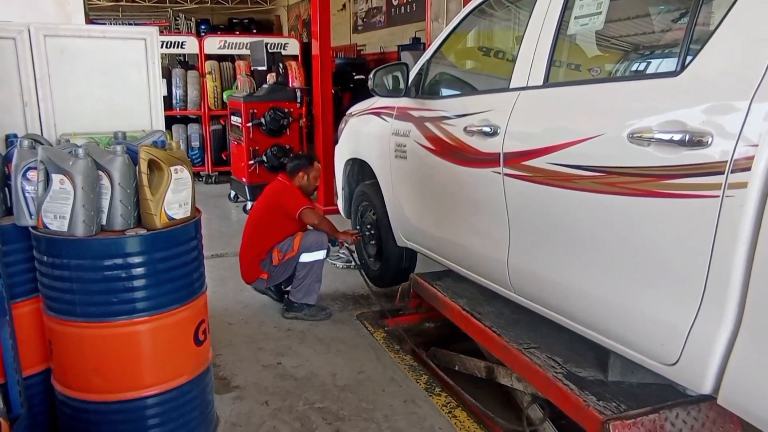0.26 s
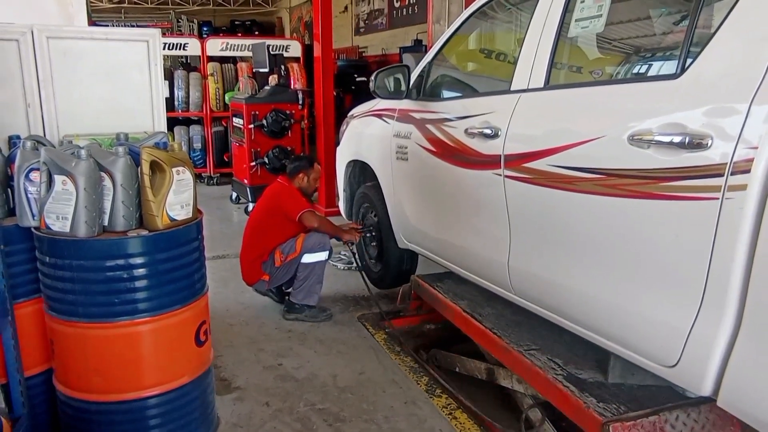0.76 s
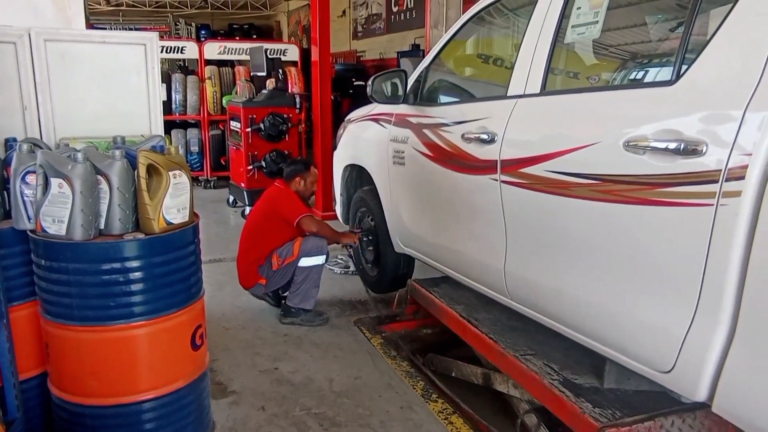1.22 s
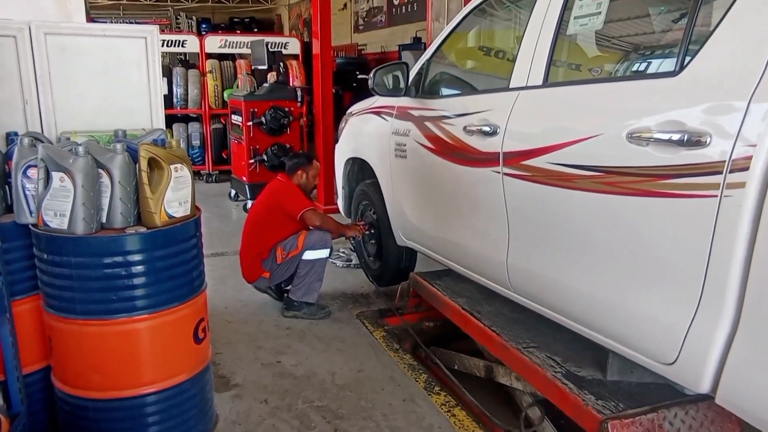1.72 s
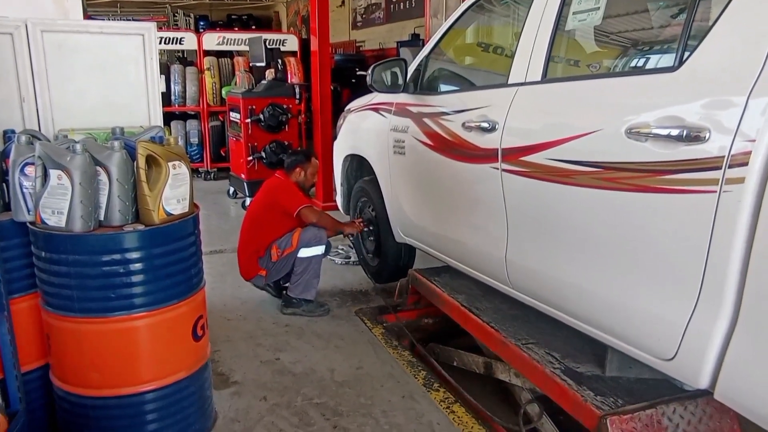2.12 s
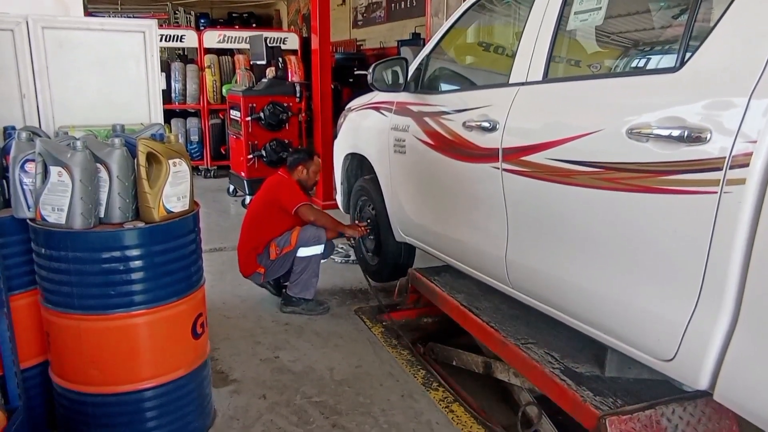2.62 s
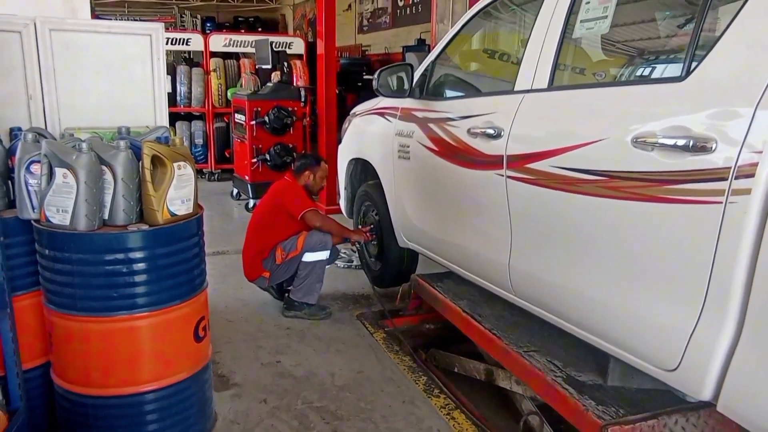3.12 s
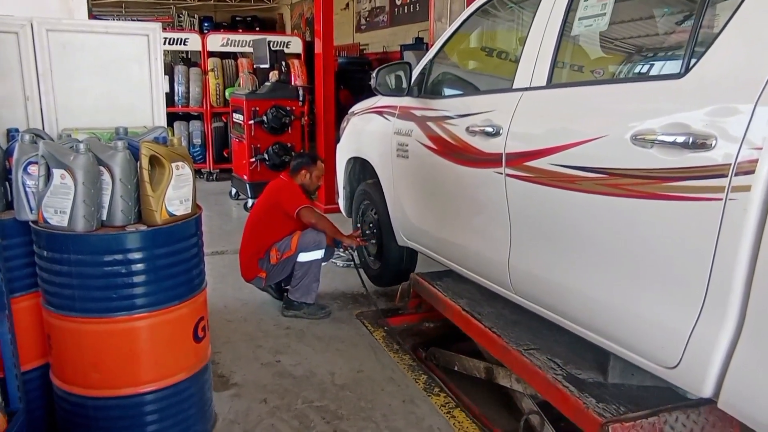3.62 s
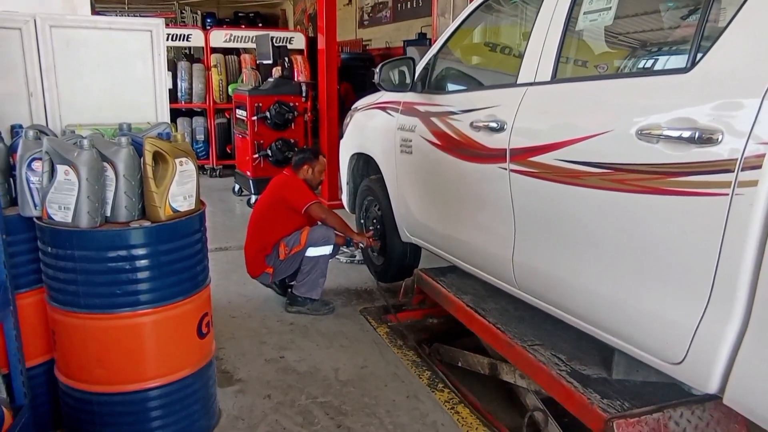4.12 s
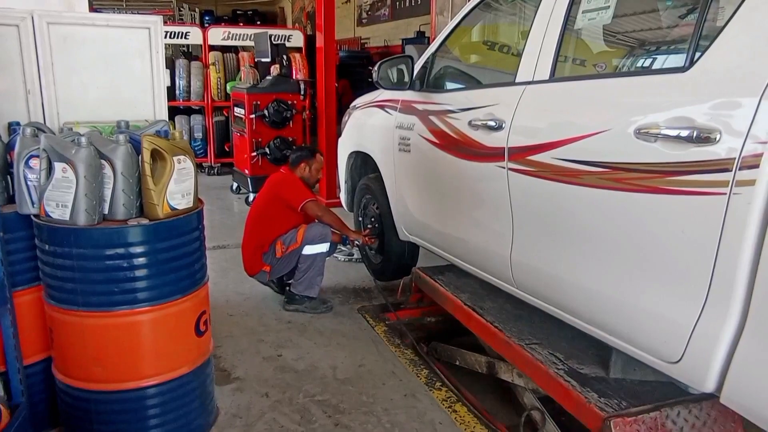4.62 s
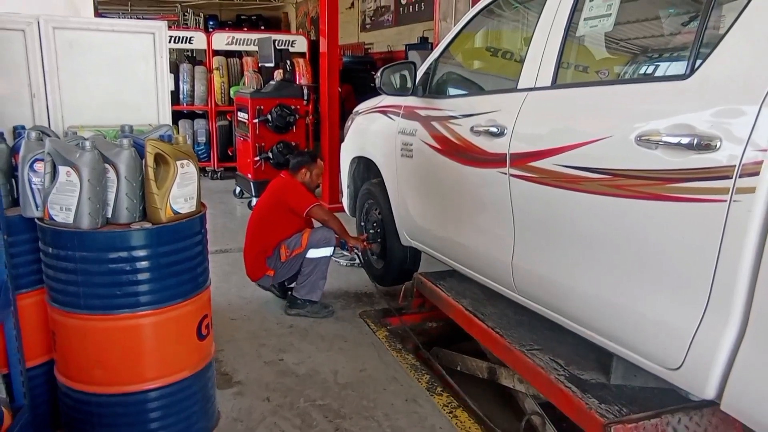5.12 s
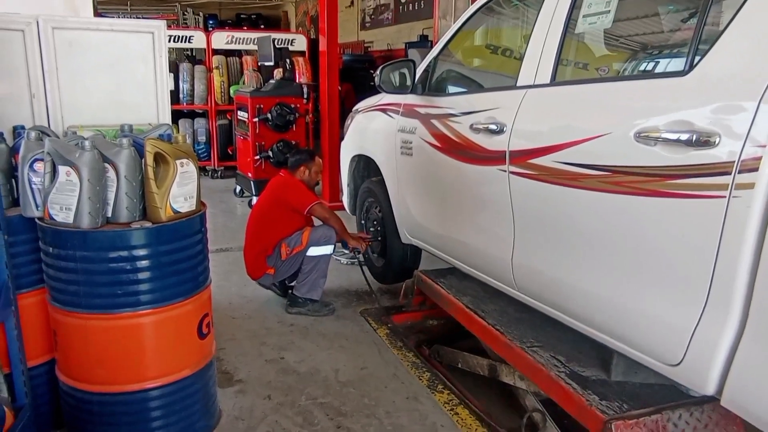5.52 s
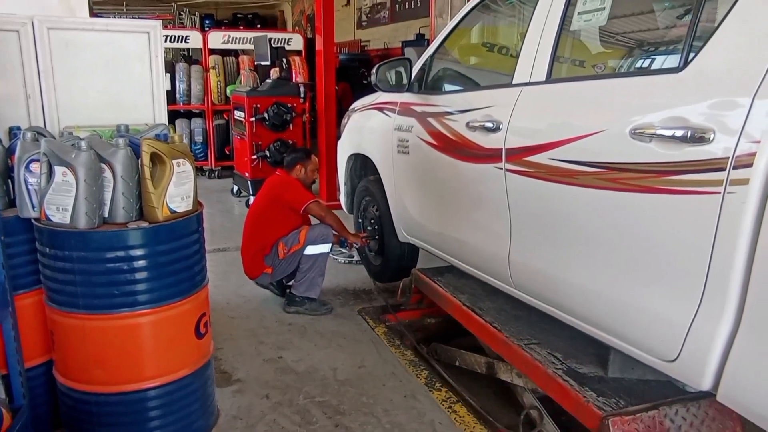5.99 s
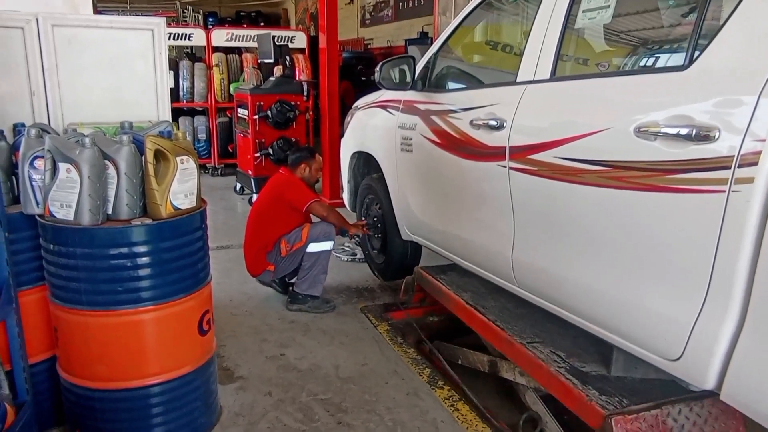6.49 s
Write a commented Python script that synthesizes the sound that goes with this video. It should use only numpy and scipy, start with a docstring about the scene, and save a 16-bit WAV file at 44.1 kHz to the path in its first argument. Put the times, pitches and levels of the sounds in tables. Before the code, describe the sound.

An air impact wrench hammers wheel nuts in rapid rattling bursts, whining up before each run, with hissing exhaust and a growing air leak in an echoing workshop.

```python
"""An air impact wrench hammers wheel nuts tight in a tyre workshop, a few metres from two microphones.
Its blows, about twenty a second, are noise cracks and thumps over ringing wheel modes; each pull of the
trigger hisses, and the free vane motor whines up in a swept tone with fuzz, then growls under load.
Whistles, clinks and a dull tone come between; the hall answers in decaying noise. Behind it lie
the shop rumble and a leaking air line, both coloured noise."""
import sys
import numpy as np
from scipy import signal
from scipy.fft import rfft, irfft
from scipy.io import wavfile
from scipy.ndimage import uniform_filter1d

SR = 44100
rng = np.random.default_rng(int(sys.argv[2]) if len(sys.argv) > 2 else 0)


def store_wav(level_fs):
    """Save 16-bit WAV to argv[1]."""
    pcm = np.round(np.clip(np.atleast_2d(level_fs), -1, 1) * 32767)
    wavfile.write(sys.argv[1], SR, pcm.T.astype(np.int16))


def undo_db(level):
    """Turn decibels back into plain size, where 20 dB means ten times bigger."""
    steps = np.asarray(level, float) / 20
    return 10 ** steps


N = 297675
LEAD = SR // 2  # samples played before time zero so that the hall is already full
M = N + LEAD


def evened(x):
    """Scales a sound to rms 1."""
    return x / np.sqrt(np.mean(x ** 2) + 1e-20)


def read(points, hz):
    """Reads a curve at the given pitches, along a log frequency axis."""
    f, value = np.transpose(points)
    return np.interp(np.log(hz + 1), np.log(f + 1), value)


def clock():
    """Time in seconds of every sample, lead-in included."""
    return (np.arange(M) - LEAD) / SR


def add(mix, s, sound):
    """Lays a sound into the mix at s seconds."""
    part = mix[LEAD + round(s * SR):][:len(sound)]
    part += sound[:len(part)]


def level(tables):
    """Gain over time from (s, dB) tables, silent between them."""
    t, out = clock(), np.zeros(M)
    for rows in tables:
        s, db = np.transpose(rows)
        inside = (t <= s[-1]) * (t >= s[0])
        out += undo_db(np.interp(t, s, db)) * inside
    return uniform_filter1d(out, size=120)


def hiss(points, size, lo=1, hi=SR):
    """Noise of rms 1 with the given colour, fading off below lo and above hi Hz."""
    hz = np.fft.rfftfreq(size, 1 / SR) + 1
    band = 1 / np.sqrt((1 + (lo / hz) ** 12) * (1 + (hz / hi) ** 12))
    spectrum = rfft(rng.standard_normal(size))
    return evened(irfft(spectrum * undo_db(read(points, hz)) * band, size))


# likeness of diffuse sound at the two microphones: pitch_hz, likeness (0-1)
LIKENESS = [(60, 0.95), (150, 0.95), (380, 0.7), (950, 0.24), (2380, 0.04), (5980, 0.031), (15000, 0.043)]


def pair(size):
    """White noise for two microphones: alike in the bass, nearly unrelated in the treble."""
    same = np.clip(read(LIKENESS, np.fft.rfftfreq(size, 1 / SR)), -1, 1)
    a, b = rfft(rng.standard_normal((2, size)))
    return irfft([a, same * a + np.sqrt(1 - same ** 2) * b], size)


def field(points, patchy_db):
    """Diffuse two-channel noise of rms 1 with drifting patches in time and pitch."""
    hz, t, z = signal.stft(pair(M), SR, nperseg=1024)
    patches = uniform_filter1d(rng.standard_normal(z.shape[1:]), size=10, axis=0)
    patches = evened(uniform_filter1d(patches, size=6, axis=1))
    gain = undo_db(read(points, hz)[:, None] + patchy_db * patches)
    return evened(signal.istft(z * gain, SR, nperseg=1024)[1][:, :M])


def resonate(x, hz, width):
    """Shifts hz down to zero, smooths, and shifts back: a resonance of gain 1, width in Hz."""
    turn = np.exp(2j * np.pi * np.cumsum(hz * np.ones(len(x))) / SR)
    r = np.exp(-np.pi * width / SR)
    return 2 * (turn * signal.lfilter([1 - r], [1, -r], x / turn)).real


def burst(rise_s, fall_s, size=4096):
    """Envelope of a strike: a quick rise and an exponential fall."""
    t = np.arange(size) / SR
    return (1 - np.exp(-t / rise_s)) * np.exp(-t / fall_s)


# colour of struck steel: pitch_hz, density_db (relative, per Hz)
STEEL = [(300, -23), (620, -16), (900, -10.5), (1250, 1.5), (1640, -5), (2850, -0.5), (5240, -3),
         (7310, 2.5), (9920, 2.5), (12000, -7), (14500, -6.5), (15800, -11), (16500, -40)]
# ringing modes of wheel and hub: pitch_hz, level_db (relative), t60_s
WHEEL = [(2540, -3, .09), (2960, 0, .09), (3230, -1, .1), (3580, -4, .1), (4335, 0, .13), (4500, -2, .1),
         (4740, -4, .1), (4975, -3, .1), (5470, -4, .08), (5675, -3, .08)]


def hammer():
    """Each blow: a bright crack of steel, a thump and ring through the wheel, a short low knock, the zing of the clutch.
    Tool and wheel rattle on a little longer, mostly away from the microphones, into the hall."""
    near, away = np.zeros((2, M))
    for s, db, thump_db, knock_db, zing_db in strikes():
        crack = undo_db(db) * hiss(STEEL, 4096, lo=4720)
        thump = hiss(STEEL, 4096, lo=1970, hi=6030)
        knock = hiss(STEEL, 4096, hi=2220)
        zing = undo_db(zing_db) * evened(resonate(rng.standard_normal(4096), 13200, 770))
        wheel = undo_db(thump_db - 18.5) * ring(WHEEL, scatter_db=5)
        rattle = crack + undo_db(thump_db + 6) * thump + undo_db(knock_db - .7) * knock + 0.82 * zing
        rattle = rattle[::-1] * burst(0.00073, 0.014)  # reversed noise no longer lines up with the blow
        bright = undo_db(db) * struck(crack, 0.00068, 0.0049) + zing * burst(0.0012, 0.0042)
        add(near, s, undo_db(-3.5) * (bright + 0.19 * rattle))
        add(near, s, undo_db(thump_db) * struck(thump, 0.0019, 0.0043))
        add(near, s, undo_db(knock_db + 7.5) * struck(knock, 0.00056, 0.0046))
        add(near, s, wheel)
        add(away, s, wheel)
        add(away, s, undo_db(-5) * rattle)
    return near, away


def ring(modes, scatter_db):
    """One strike on a set of decaying modes, each caught a little differently."""
    t = np.arange(SR // 8) / SR
    hz, db, t60 = np.transpose(modes)[:, :, None]
    luck = rng.standard_normal((len(modes), 2))
    decay = undo_db(db + scatter_db * luck[:, :1] - 60 * t / t60)
    return (decay * np.sin(2 * np.pi * hz * (1 + 0.003 * luck[:, 1:]) * t)).sum(0)


def struck(noise, rise_s, fall_s):
    """A burst of noise that always carries the energy of its envelope."""
    shape = burst(rise_s, fall_s)
    return evened(noise * shape) * np.sqrt(np.mean(shape ** 2))


# hammer blows: start_s, crack_db (relative)
BLOWS = [(0.0115, -4.5), (0.0603, -7), (1.5316, -5), (1.581, -6), (1.6326, -6), (1.6845, -7), (1.74, -3),
         (1.7908, -7.5), (1.84, -7), (1.8913, -6), (1.942, -4), (1.995, -4), (2.0456, -1), (2.0942, -1),
         (2.1438, -9), (2.8084, -5), (2.8546, -5), (2.9071, -1.5), (2.9549, -1.5), (3.0032, -4),
         (3.0532, -5.5), (3.1039, -3), (3.1567, -3), (3.2036, -1), (3.2524, -2.5), (3.3018, -2),
         (3.3517, 0), (3.4042, -0.5), (3.4528, -4), (4.1194, -2.5), (4.1708, -5), (4.2207, -3),
         (4.2674, -2), (4.318, -2.5), (4.3662, 0.5), (4.4192, -1), (4.4689, -0.5), (4.521, -3), (4.572, -3),
         (4.6225, -5), (5.6773, -2.5), (5.7242, -3.5), (5.7725, -7), (5.8184, -6), (5.8681, -6.5),
         (5.9165, -0.5), (5.9673, -2.5), (6.0135, -4), (6.686, -4), (6.7351, -3)]
# the clutch catching as the motor runs free: start_s, crack_db, thump_db, zing_db (all relative)
CATCHES = [(1.326, -9.5, -23.5, -4.5), (1.3861, -4, -20, -4.5), (2.6605, -7.5, -35, -8),
           (3.9699, -4.5, -22, -5), (6.52, -8.5, -24, -3.5)]
# pulls of the trigger: pull_s, seat_s (the nut seats), release_s, puff_db, seat_db, release_db (air levels)
PULLS = [(-.4, -.3, 0.085, -22, -25, -21), (1.288, 1.485, 2.21, -21.5, -26, -23),
         (2.616, 2.782, 3.55, -19.5, -23, -20.5), (3.914, 4.068, 4.64, -23.5, -22.5, -23),
         (5.643, 5.658, 6.03, -22, -22.5, -23.5), (6.47, 6.672, 6.82, -26.5, -23.5, -32)]
# the nut under each pull: thump_db (relative), growth_db_per_s (as it tightens), labour_db, surge_db (at seating)
NUTS = [(-13, 0, -33, 2), (-13, 0.5, -33, 4.5), (-14, 5.5, -34, -3), (-13, 2, -32, 0), (-13, 2, -32.5, 0.5),
        (-10, 3, -32.5, 0)]


def strikes():
    """Every strike as (s, crack dB, thump dB, knock dB, zing dB): earlier blows, blows and catches."""
    knock_base_db, zing_base_db, uneven_db = -30, -21, 3
    thump_follows, last_db = 0.48, 2  # share of the crack dB; the last blow of a burst lands heavier
    # evenly spaced blows that already ring in the hall
    earlier = [(BLOWS[0][0] - k * .05, -7) for k in range(9, 0, -1)]
    s, db = np.transpose(earlier + list(BLOWS))
    seated = np.transpose(PULLS)[1]
    nut = np.maximum(np.searchsorted(seated, s) - 1, 0)
    base_db, growth = np.array(NUTS)[nut, :2].T
    last = np.diff(nut, append=nut[-1]) > 0  # the next blow falls on another nut
    luck = uneven_db * (rng.exponential(size=(len(s), 2)) - 1)
    thump_db = base_db + thump_follows * db + growth * (s - seated[nut]) + last_db * last
    blows = zip(s, db, thump_db, knock_base_db + luck[:, 0], zing_base_db + luck[:, 1])
    catches = [(s, db, thump_db, knock_base_db, zing_db) for s, db, thump_db, zing_db in CATCHES]
    return list(blows) + catches


SHUT_S = 0.026  # the air valve's closing time
# colour of the exhaust jet: pitch_hz, density_db (relative, per Hz)
JET = [(300, -26), (600, -26), (900, -15.5), (1530, -14), (2650, -7), (5240, -12), (7310, -2.5),
       (10100, -2.5), (13400, -6), (15800, -13), (16500, -36)]


def exhaust():
    """Air leaves the handle in fluttering puffs; it sprays wide, so each microphone hears its own hiss."""
    open_s, valve_db = 0.029, -9  # the valve opens from and closes to this far down
    flutter = evened(uniform_filter1d(rng.standard_normal(M), size=150))
    spray = irfft(rfft(pair(M)) * undo_db(read(JET, np.fft.rfftfreq(M, 1 / SR))), M)
    flow = []
    for pull, seat, off, puff_db, seat_db, off_db in PULLS:
        opening = [(pull, puff_db + valve_db), (min(pull + open_s, seat), puff_db)]
        closing = [(off, off_db), (off + SHUT_S, off_db + valve_db)]
        flow.append(opening + [(seat, seat_db)] + closing)
    return level(flow) * evened(spray) * undo_db(1.3 * flutter)


# vane motor spinning free: start_s, end_s, from_hz, towards_hz (before the sag), level_db (relative)
SPINS = [(1.295, 1.48, 170, 415, -33), (1.49, 1.56, 450, 490, -33), (2.65, 2.8, 300, 485, -34),
         (3.93, 4.11, 180, 492, -33.5), (6.485, 6.675, 160, 512, -35)]
# fuzz in each spin: share (0-1)
SPIN_ROUGH = [.55, .4, .6, .3, .25]


def spin():
    """The free motor whines upward and sags a little, partly a clean tone and partly fuzz."""
    spin_up_s, sag_hz_per_s = .045, 250
    out = np.zeros(M)
    for (start, end, from_hz, top_hz, db), rough in zip(SPINS, SPIN_ROUGH):
        t = np.arange(0, end - start, 1 / SR)
        hz = top_hz - (top_hz - from_hz) * np.exp(-t / spin_up_s) - sag_hz_per_s * t
        turn = 2 * np.pi * np.cumsum(hz) / SR
        tone = np.sqrt(2) * (np.sin(turn) + 0.11 * np.sin(2 * turn))
        fuzz = evened(resonate(rng.standard_normal(len(t)), hz, 60))
        whine = (1 - rough) * tone + rough * fuzz
        add(out, start, undo_db(db) * whine * signal.windows.tukey(len(t), .15))
    return out


# drumming car body and tyre: pitch_hz, width_hz, level_db (relative)
DRUM = [(146, 54, -6), (208, 130, -4.5), (412, 133, -6)]


def labour():
    """Every blow stalls the rotor; it speeds up again, a rising growl, while the car body drums along."""
    t, at = clock(), np.transpose(BLOWS)[0]
    since = np.abs(t - at[np.maximum(np.searchsorted(at, t) - 1, 0)])  # seconds from the latest blow
    hz = 90 + 260 * (1 - np.exp(-since / 0.096))
    growl = evened(resonate(rng.standard_normal(M), hz, 47)) * np.minimum(since / 0.011, 1)
    shake = rng.standard_normal(M)
    drum = sum(undo_db(db) * evened(resonate(resonate(shake, f, w), f, w)) for f, w, db in DRUM)
    return load() * evened(drum + 0.4 * growl)


def load():
    """Gain of the labouring motor: the tool jerks at the pull, then a surge and a steady level until release."""
    kick_db, kick_s, surge_s = -30, 0.027, 0.054
    t, out = clock(), np.zeros(M)
    for (pull, seat, off, *_), (*_, db, surge_db) in zip(PULLS, NUTS):
        out += undo_db(kick_db) * (t >= pull) * np.exp(-np.abs(t - pull) / kick_s)
        surge = surge_db * np.exp(-((t - seat) / surge_s) ** 2)
        out += undo_db(db + surge) * (t >= seat) * (t < off + SHUT_S)
    return uniform_filter1d(out, size=400)


# thin wavering whistles: start_s, pitch_hz, level_db (relative), t60_s
WHISTLES = [(.03, 3580, -31, .55), (0, 4290, -25, .7), (1.53, 4330, -29, 1.8), (2.08, 13000, -25, 1.1),
            (3.43, 4340, -22, .4), (3.46, 4500, -23, .3), (3.45, 4965, -19, .5), (3.45, 5480, -23, .3),
            (3.45, 12960, -25, .9), (4.6, 4330, -29, .45), (6.04, 4330, -23, .4)]


def whistles():
    """Narrow bands of noise that swell quickly and die away."""
    out, t = np.zeros(M), np.arange(SR // 2) / SR
    for s, hz, db, t60 in WHISTLES:
        fuzzy = evened(resonate(resonate(rng.standard_normal(len(t)), hz, 35), hz, 35))
        add(out, s, undo_db(db - 60 * t / t60) * np.minimum(t / 0.02, 1) * fuzzy)
    return out


# socket clinking on a nut: start_s, level_db (relative), pitch_hz
CLINKS = [(0.3707, -27, 5200), (0.4517, -26.5, 6870), (1.2205, -41, 1910), (1.257, -27, 2010),
          (2.4494, -22, 7670)]


def clinks():
    """Small metal ticks: a noise burst and the resonance it excites."""
    out = np.zeros(M)
    for s, db, hz in CLINKS:
        tick = hiss(STEEL, 4096) * burst(0.00054, 0.0063)
        tone = evened(resonate(tick, hz, 200)) * burst(0.0013, 0.0053)
        add(out, s, undo_db(db - 12.0) * (tick + 0.24 * tone))
    return out


# a short dull tone: start_s, level_db (peak, relative), pitch_hz, length_s
PING = (5.6, -43.5, 880, .085)


def ping():
    """One short sine with soft ends."""
    out, (s, db, hz, length_s) = np.zeros(M), PING
    t = np.arange(0, length_s, 1 / SR)
    add(out, s, undo_db(db) * signal.windows.tukey(len(t), .4) * np.sin(2 * np.pi * hz * t))
    return out


def nearby(x):
    """The straight path, a little later on the right, and echoes off floor and car door."""
    taps = np.zeros((2, 400))
    taps[[0, 1], [0, 12]] = 1
    at = rng.integers(30, 400, size=(2, 6))
    echoes = undo_db(-8.5 - 8 * at / 400) * rng.choice([-1, 1], size=at.shape)
    np.put_along_axis(taps, at, echoes, axis=1)
    low = signal.sosfiltfilt(signal.butter(2, 600, fs=SR, output="sos"), x)  # long waves arrive alike
    return low + signal.oaconvolve((x - low)[None], taps, axes=1)[:, :M]


# decay of the hall: pitch_hz, t60_s
HALL = [(150, 0.9), (600, 0.84), (2000, 0.78), (5000, 0.8), (12000, 0.43)]


def hall(x):
    """Diffuse tails, each band dying at its own speed; two of them take turns as the air shifts."""
    out, turn = 0, 2 * np.pi * 1.3 * clock_from_lead()
    for share in (np.sin(turn), np.cos(turn)):
        hz, t, z = signal.stft(pair(SR), SR, nperseg=256)
        decay = undo_db(-60 * t / read(HALL, hz)[:, None])
        tail = signal.istft(z * decay, SR, nperseg=256)[1][:, :SR]
        tail *= np.clip((np.arange(SR) / SR - .003) / 0.0053, 0, 1)  # reflections build up
        tail /= np.linalg.norm(tail[0])
        out = out + signal.fftconvolve((x * share)[None], tail, axes=1)[:, :M]
    return out


def clock_from_lead():
    """Time in seconds counted from the start of the lead-in."""
    return np.arange(M) / SR


# leaking air line: start_s, level_db, treble_db (relative to the level)
LEAK = [(-.5, -45, 5), (.45, -45, 9), (.65, -51.5, 10), (1.2, -51, 8), (2.3, -46, 9), (2.6, -43.5, 7),
        (3.55, -35, 10), (3.75, -29.5, 13), (3.9, -32, 9), (4.8, -33, 8), (5.6, -33.5, 8), (6.1, -33, 18.5),
        (6.45, -30.5, 14), (6.75, -26, 15.5)]
# colour of the leak: pitch_hz, density_db (relative, per Hz)
LEAK_COLOUR = [(410, -58), (700, -14), (1080, -12.5), (1380, -15), (2130, -1.5), (4610, -1.5), (5540, 0.5),
               (7690, 1), (11400, -10), (16000, -23)]


def leak():
    """A steady hiss whose level and treble drift."""
    s, db, treble_db = np.transpose(LEAK)
    hiss_pair = field(LEAK_COLOUR, patchy_db=.4)
    top = signal.sosfilt(signal.butter(2, 10500, "high", fs=SR, output="sos"), hiss_pair)
    body = level([np.c_[s, db]])
    extra = level([np.c_[s, db + treble_db]]) - body
    return body * hiss_pair + extra * top


# colour of the shop rumble: pitch_hz, density_db (relative, per Hz)
SHOP = [(24, -51), (40, -10.5), (140, -3), (167, -6), (204, 1), (269, -16), (297, -6.5), (337, -6),
        (392, -10.5), (422, -8.5), (715, -22), (790, -21), (16000, -38.5)]


def shop():
    """The rumble of the shop: steady, slightly patchy noise, strongest in the bass."""
    return undo_db(-38.5) * field(SHOP, patchy_db=1)


def scene():
    """Straight path, hall, shop rumble and leak."""
    (blows, rattle), air, ticks, thin = hammer(), exhaust(), clinks(), whistles()
    whine, motor = spin(), labour() + ping()
    near = nearby(undo_db(-1.63) * blows + whine + motor + ticks + thin) + air
    tool_send = undo_db(-2.5) * rattle + undo_db(-5.0) * air[0] + undo_db(-7.0) * motor + undo_db(-13) * whine
    far = hall(tool_send + undo_db(7) * ticks + thin / 2)
    return (near + far + shop() + leak())[:, LEAD:]


# colour difference of the microphones: pitch_hz, left_minus_right_db
TILT = [(60, 0), (150, 0), (380, -1), (950, -1.5), (2380, -6), (5980, -6.5), (9500, -0.5), (15000, -1)]


def microphones(dry):
    """The microphones lose the deepest bass and differ in colour; the loudest peaks clip; then the band limit."""
    hz = np.fft.rfftfreq(N, 1 / SR)
    tilt_db = read(TILT, hz) / 2
    bass = hz ** 2 / (hz ** 2 + 50 ** 2)
    coloured = irfft(rfft(dry) * bass * undo_db(np.array([tilt_db, -tilt_db])), N)
    clipped = np.clip(coloured, -1, 1)
    return irfft(rfft(clipped) * (hz < 16100), N)


def band_limit(x):
    """A steep low-pass at the top of the band."""
    return signal.sosfilt(signal.butter(12, 16730, fs=SR, output="sos"), x)


def record(dry):
    """Two microphones pick up the scene."""
    mix = microphones(dry)
    return band_limit(mix)


dry = scene()
out = record(dry)
store_wav(out)
```